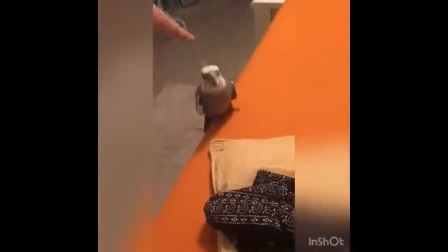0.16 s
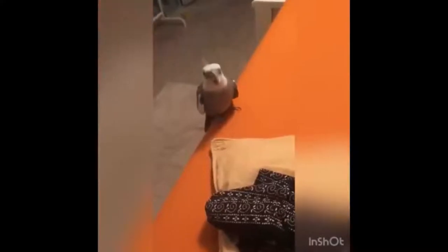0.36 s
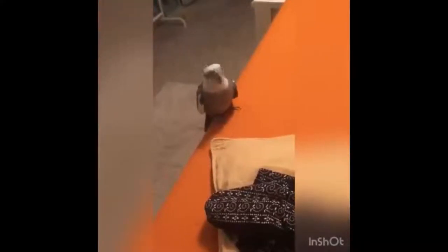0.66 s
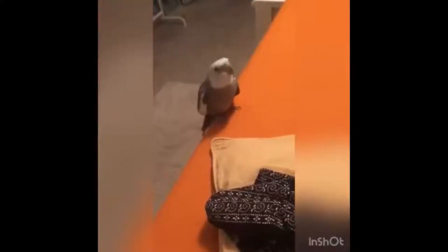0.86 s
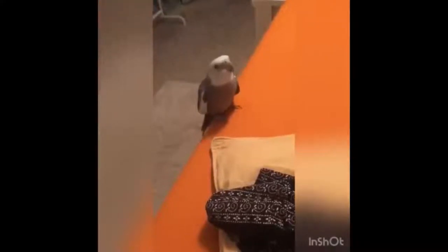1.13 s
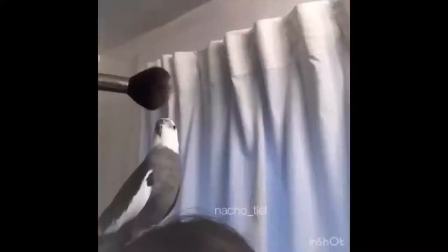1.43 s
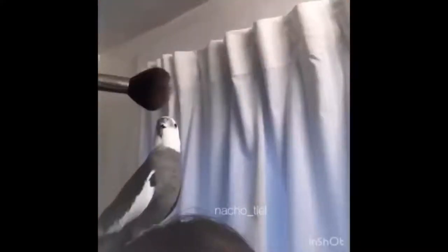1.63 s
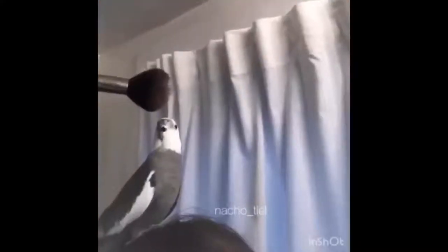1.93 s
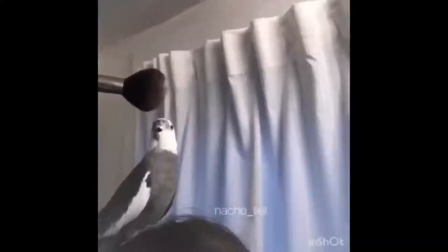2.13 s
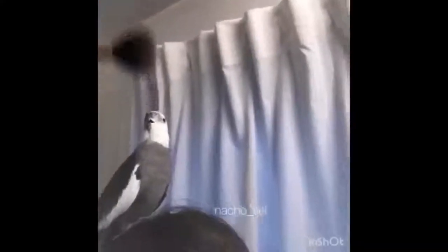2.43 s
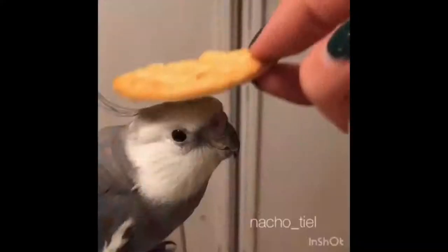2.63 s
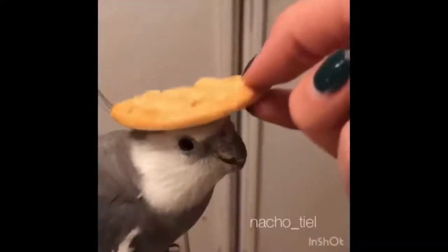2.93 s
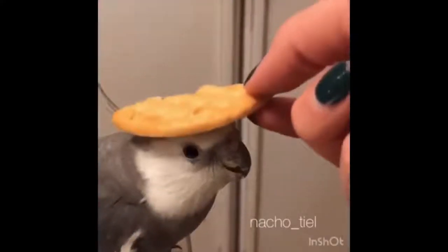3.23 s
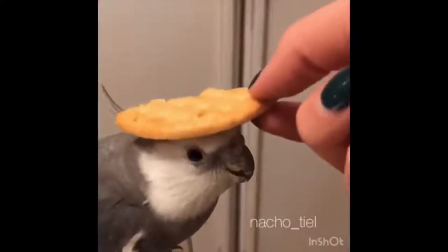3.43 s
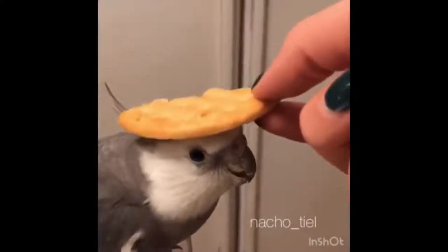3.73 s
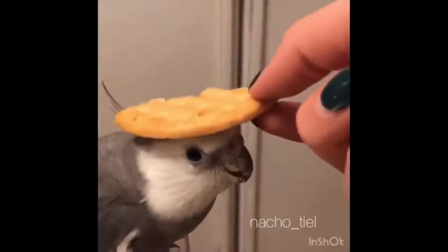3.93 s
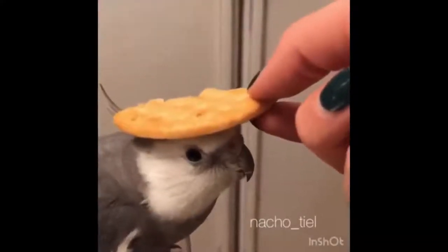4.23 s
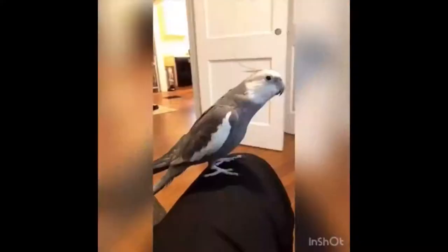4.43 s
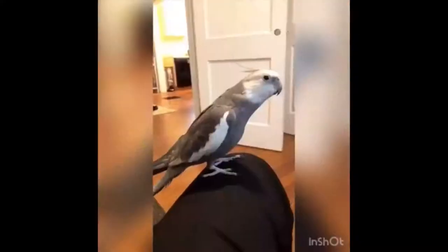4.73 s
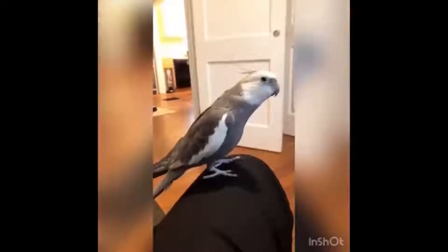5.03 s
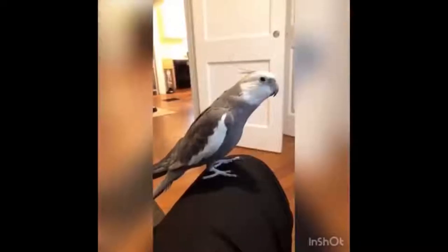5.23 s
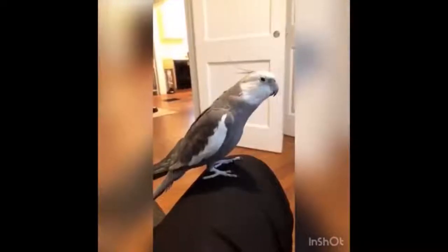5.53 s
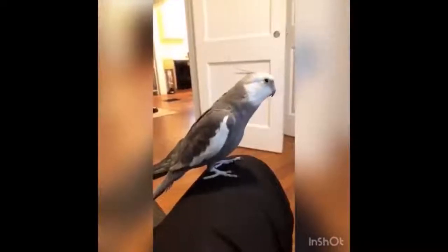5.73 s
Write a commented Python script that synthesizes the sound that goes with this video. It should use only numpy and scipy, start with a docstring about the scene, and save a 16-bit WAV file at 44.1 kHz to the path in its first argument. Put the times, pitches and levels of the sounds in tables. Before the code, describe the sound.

A cockatiel is already calling at the start, a little way from the microphone in a small, slightly echoing room. The call is loud, high and drawn out, with a rapid quaver, and it drops into a rasp at about 0.7 seconds. The faint room tone changes abruptly at 1.25 seconds. From 1.5 to 2.3 seconds a second call climbs out of a rasp, holds its shrill, trilling pitch and falls away. At about 2.6 seconds the low background noise jumps up, and from 2.9 to 4.1 seconds comes a third call of the same shape, very close, the longest and loudest. At 4.4 seconds the sound cuts to a much quieter room with a faint, low appliance hum. Four barely audible breathy puffs pass between 4.6 and 5.9 seconds, and the hum lasts to the end at about 6 seconds.

```python
"""A cockatiel in mid-call, long and quavering, across a table from the microphone. Two more calls follow,
each in its own room: one before a curtain, one very close. A fourth room holds a hum and breathy puffs.
Each call is a chain of throbs, about 27 a second: the membrane of the syrinx tightens and slackens, so
pitch and loudness arch in every throb. The voice climbs out of a rasp, holds near 2 kHz and sinks back
into one. Every room has its own steady room tone."""
import sys
import numpy as np
from scipy import signal
from scipy.fft import rfft, irfft, next_fast_len
from scipy.io import wavfile
from scipy.ndimage import uniform_filter1d, minimum_filter1d, map_coordinates

SR = 44100
rng = np.random.default_rng(int(sys.argv[2]) if len(sys.argv) > 2 else 0)


def unload_wav(signal):
    """Save mono or channel-first audio to the path in sys.argv[1] as 16-bit WAV at rate SR, clipped to [-1, 1]."""
    wavfile.write(
        sys.argv[1],
        SR,
        np.round(np.clip(np.atleast_2d(signal).T, -1, 1) * 32767).astype(np.int16),
    )


N = 258867
TIME = np.arange(N) / SR

# rhythm of each call: (first throb [s], end of the call [s], rate [throbs/s], slowing [throbs/s per s])
CALL_RHYTHMS = [(-.3002, .742, 26.73, 1.104), (1.501, 2.292, 28.16, .07), (2.873, 4.149, 29.035, 3.17)]
# resonances of each bird's throat and beak: (frequency [Hz], relative level [dB])
TABLE_THROAT = [(1000, -17), (1750, -8.5), (2050, 0), (3000, -10.5), (3600, -9.5), (4100, 1), (4900, -6),
                (5700, -1), (6150, -7), (7500, -13.5), (8150, -12.5), (10100, -27.5), (12000, -13),
                (14000, -26.5)]
CURTAIN_THROAT = [(1000, -2), (1700, 3.5), (2150, 0), (2900, 2.5), (3700, -1), (4300, 3.5), (4900, 2),
                  (5700, 9), (6450, -1.5), (7100, -8), (8600, -12.5), (10700, -23), (12900, -16),
                  (14000, -37.5)]
CLOSE_THROAT = [(1000, -23), (1700, -6.5), (2130, 0.5), (2800, -7.5), (3500, -12.5), (4280, -0.5),
                (4900, -3), (5700, 0.5), (6450, 3.5), (7400, -2), (8500, -4), (9600, -16.5), (11200, -15),
                (12700, -8)]
# opening of each beak, as the strength of its resonance: (time [s], level [dB])
TABLE_BEAK = [(.2, 0.5), (.42, 3.5), (.52, -1), (.68, 1.5), (.74, -5)]
CURTAIN_BEAK = [(1.54, -12), (1.72, -1.5), (2.2, 6), (2.294, -11)]
CLOSE_BEAK = [(2.9, -3), (3.1, 1.5), (4.05, 6), (4.14, 2)]
def birds():
    """Three cockatiels at the microphone: across a table, before a curtain, and very close."""
    table = call(
        CALL_RHYTHMS[0], TABLE_BEAK, TABLE_THROAT,
        tune=dict(held_hz=2123.5, sink_hz_per_s=130, climb_hz=730, drop_hz=256, drop_s=.028),
        effort=dict(held_db=-14, swell_db=16.5, attack_s=.095, tiring_db_per_s=5, drop_db=14),
        grain=dict(rasp_db=-26.5, break_db=4, tilt_db=0, dulling_per_s=-.4),
        sag=.145, dip_db=8, dull_db=3.5, fuzz_db=-30.5, slip_db=-34.5, fade_s=.014)
    curtain = call(
        CALL_RHYTHMS[1], CURTAIN_BEAK, CURTAIN_THROAT,
        tune=dict(held_hz=2131.3, sink_hz_per_s=-72, climb_hz=835, drop_hz=314, drop_s=.054),
        effort=dict(held_db=-13, swell_db=21.5, attack_s=.039, tiring_db_per_s=-.8, drop_db=6),
        grain=dict(rasp_db=-53.5, break_db=-1, tilt_db=2.5, dulling_per_s=.5),
        sag=.125, dip_db=11, dull_db=7.5, fuzz_db=-26, slip_db=-46.5, fade_s=.0063)
    close = call(
        CALL_RHYTHMS[2], CLOSE_BEAK, CLOSE_THROAT,
        tune=dict(held_hz=2170, sink_hz_per_s=42, climb_hz=673, drop_hz=513, drop_s=.047),
        effort=dict(held_db=-4, swell_db=13, attack_s=.07, tiring_db_per_s=3, drop_db=13),
        grain=dict(rasp_db=-48, break_db=4, tilt_db=.5, dulling_per_s=2),
        sag=.145, dip_db=9.5, dull_db=3.5, fuzz_db=-28.5, slip_db=-34, fade_s=.011)
    # this close, the microphone yields unevenly and the throbs leave a faint flutter
    close = close - .055 * close ** 2
    return [room(table, near_db=-12, near_t60=.09, far_db=-19, far_t60=.53),
            amp(-.45) * room(curtain, near_db=-6.5, near_t60=.098, far_db=-15.5, far_t60=.25),
            amp(1) * room(close, near_db=-20, near_t60=.04, far_db=-17.5, far_t60=.35)]


def call(rhythm, opening, throat, tune, effort, grain, sag, dip_db, dull_db, fuzz_db, slip_db, fade_s):
    """The syrinx sounds a throbbing harmonic tone, coloured by throat and beak, with fuzz and rasp."""
    taut_hz, beak_hz = 2100, 6000
    start, end = rhythm[:2]
    live = (TIME > start - .05) & (TIME < end + .05)
    t = TIME[live]
    age, left = np.maximum(t - start, 0), np.maximum(end - t, 0)
    turn = throbs(t, *rhythm)
    crest_hz = crest_pitch(age, left, **tune) + 12 * wobble(.98, turn)  # no two throbs are alike
    level_db = loudness(age, left, **effort) - .25 * wobble(1, turn)
    rasp_db, bright_db = texture(age, left, **grain)
    beak_db = np.interp(t, *np.transpose(opening))

    def colour(hz):
        beak = beak_db * np.exp(-((hz - beak_hz) / 1000) ** 2)
        return amp(along(throat, hz) + bright_db * np.log2(hz / crest_hz) + beak)

    # between throbs the membrane slackens: it sinks in pitch, goes dull and swings less evenly
    gap = np.sin(np.pi * turn) ** 2  # 0 on a crest, 1 between throbs
    slack = (.6 * gap + .4 * gap ** 3) * (taut_hz / crest_hz) ** 2.2  # low throbs let go further
    jitter = .004 * wobble(200, t) + .007 * gap * wobble(1000, t)
    throbbing = 1 - np.exp(-(left / .043) ** 2)  # the last throbs melt into one downward slide
    trill = sag * (1 - .2 * age) * (.5 + .5 * throbbing)  # the pitch swing eases with time
    trill *= 1 + .1 * wobble(1, turn + .5)
    pitch = crest_hz * np.exp(jitter - trill * slack)
    phase = 2 * np.pi * np.cumsum(pitch) / SR
    chirping = 1 + .55 * np.exp(-(age / .17) ** 2)  # the first throbs stand apart as chirps
    dip = throbbing * chirping * (.16 * slack + .84 * choke(turn))

    k = np.arange(1, 8)[:, None]  # harmonic numbers
    flutter_db = np.sqrt(k) * np.array([wobble(60, t) for _ in k])
    swing = amp(flutter_db - (dip_db + dull_db * (k - 2)) * dip)
    fuzz = turbulence(t, k, gap, fuzz_db, rasp_db)
    spread = np.pi * k * (k - 1) / 4  # overtone phases are spread to keep the tone's peaks low
    tone = -np.sum(colour(k * pitch) * (swing + fuzz) * np.exp(1j * (k * phase - spread)), axis=0).real
    tone += octave_slips(t, turn, gap, k, pitch, phase, colour, slip_db)
    tone /= np.sqrt(np.sum(colour(k * crest_hz) ** 2, axis=0) / 2)
    voice = (tone + rasp(t, rasp_db, dip)) / np.sqrt(1 + amp(rasp_db) ** 2)
    voice = spectral_notches(voice, rasp_db)

    outside_s = np.maximum(start - t, 0) + np.maximum(t - end, 0)
    out = np.zeros(N)
    out[live] = voice * amp(level_db) * np.exp(-(outside_s / fade_s) ** 1.2)
    return out


def throbs(t, start, end, rate, slowing):
    """Throbs counted so far: their rate sinks steadily and hurries at both ends of the call."""
    age = t - start
    gained_early = .4 * (1 - np.exp(-age / .15))
    gained_late = .33 * np.exp(np.minimum(t - end, 0) / .03)
    return rate * age - slowing * age ** 2 / 2 + gained_early + gained_late


def crest_pitch(age, left, held_hz, sink_hz_per_s, climb_hz, drop_hz, drop_s, climb_s=.06):
    """Pitch at the top of the throbs: a scoop up, a slowly drifting hold, a final drop."""
    scoop = climb_hz * np.exp(-age / climb_s)
    drop = drop_hz * np.exp(-(left / drop_s) ** 2)
    return held_hz - scoop - sink_hz_per_s * age - drop


def loudness(age, left, held_db, swell_db, attack_s, tiring_db_per_s, drop_db, release_s=.023):
    """Level in dB: a swell, a slowly drifting hold, a quick release."""
    swell = swell_db * np.exp(-age / attack_s)
    release = drop_db * np.exp(-(left / release_s) ** 2)
    return held_db - swell - tiring_db_per_s * age - release


def texture(age, left, rasp_db, break_db, tilt_db, dulling_per_s, settle_s=.14, break_s=.016):
    """Rasp (dB) and brightness (dB per octave): hoarse and dull at both ends, clear in between."""
    unsettled = np.exp(-(age / settle_s) ** 2)
    breaking = np.exp(-(left / break_s) ** 2)
    hoarseness = amp(rasp_db) + amp(-11.5) * unsettled + amp(break_db) * breaking
    bright_db = tilt_db - dulling_per_s * age - 13.5 * np.exp(-age / .04) - 1.5 * breaking
    return 20 * np.log10(hoarseness), bright_db


def choke(turn, lead=.025, softness=.14):
    """Near 0 while a throb sounds, near 1 between throbs; loudness leads pitch by a share of a throb."""
    gap = np.sin(np.pi * (turn + lead)) ** 2
    return .5 + .5 * np.tanh((gap - .62) / (2 * softness))


def turbulence(t, k, gap, fuzz_db, rasp_db):
    """Eddies wrap each overtone in a band of noise, wider for the high ones, that outlasts the throb."""
    eddies = np.array([wobble(280 * n, t) + 1j * wobble(280 * n, t) for n in k])
    fraying = amp(rasp_db - 17.5) * np.sqrt(k)  # a hoarse voice frays its overtones further
    return (amp(fuzz_db) * k ** .8 + fraying) * (.8 + .4 * gap) * eddies


# the clearest raspy spots, where the voice slips an octave down: (time [s], subharmonic level [dB])
OCTAVE_SLIPS = [(.67, -26), (1.902, -25.5), (2.07, -24.5), (2.145, -23.5), (2.988, -18.5), (3.34, -16),
                (3.485, -19), (3.61, -19)]
def octave_slips(t, turn, gap, k, pitch, phase, colour, slip_db, spread_db=6):
    """Alternate swings of the membrane differ, so tones appear halfway between the harmonics."""
    clear = sum(amp(db) * np.exp(-((t - at) / .0071) ** 2) for at, db in OCTAVE_SLIPS)
    by_chance = gap ** 2 * amp(slip_db + spread_db * wobble(1, turn + .5))
    half_phases = (k - .5) * (phase + .5 * wobble(700, t))
    return (clear + by_chance) * np.sum(colour((k - .5) * pitch) * np.cos(half_phases), axis=0)


# spectrum of the rasp: (frequency [Hz], relative density [dB])
RASP_SPECTRUM = [(300, -25.5), (900, -4.5), (1300, -9.5), (1750, -8), (2400, 2), (3700, -0.5), (4800, 9.5),
                 (5800, 7), (6800, -10.5), (8000, 2.5), (9800, -26), (12500, -9.5), (14000, -20)]
def rasp(t, rasp_db, dip, pulse_db=7):
    """Air torn at the syrinx: a broad, rough noise that pulses with the throbs."""
    return noise(RASP_SPECTRUM, len(t)) * amp(rasp_db + 4.3 * wobble(120, t) - pulse_db * dip)


# narrow dark bands in the call's sound: (frequency [Hz], gain [dB])
SPECTRAL_NOTCHES = [(2650, -3), (4950, -18), (9350, -9.5)]
def spectral_notches(voice, rasp_db, half_width_hz=350):
    """Narrow bands are dark while the tone is held and fill in as the call turns to rasp."""
    def response(hz):
        return amp(sum(db * np.exp(-((hz - mid) / half_width_hz) ** 2) for mid, db in SPECTRAL_NOTCHES))

    loose = np.clip((rasp_db + 20) / 20, 0, 1)
    return loose * voice + (1 - loose) * filtered(voice, response)


def room(x, near_db, near_t60, far_db, far_t60):
    """The microphone hears the direct sound, a flurry off near surfaces and a duller tail off the walls."""
    t = TIME[:SR // 2]
    near = rng.standard_normal(len(t)) * amp(-60 * t / near_t60) * (t > .002)
    hz, frame_s, spectra = signal.stft(rng.standard_normal(len(t)), SR, nperseg=256)
    decay = amp(-60 * frame_s / far_t60 * (1 + hz[:, None] / 16000) - hz[:, None] / 2600)
    far = signal.istft(spectra * decay, SR, nperseg=256)[1][:len(t)]
    echo = amp(near_db) * near / np.linalg.norm(near) + amp(far_db) * far / np.linalg.norm(far)
    return x + signal.fftconvolve(x, echo)[:N]


# faint, breathy puffs in the last room: (time [s], length [s], level [dB])
PUFFS = [(4.574, 0.161, -65), (4.788, .28, -65.5), (5.35, 0.24, -72), (5.658, 0.19, -62.5)]
# their narrow resonances: (frequency [Hz], width [Hz], relative level [dB])
PUFF_RESONANCES = [(1258, 27, 2), (2250, 27, -6), (4590, 45, -11), (6200, 57, -15), (7150, 78, -19)]
# their broad hiss: (frequency [Hz], relative density [dB])
PUFF_HISS = [(300, -20), (800, 1), (2200, -3), (7000, -12.5), (10000, -20)]
def breathy_puffs(attack_s=.014, fade_db=7):
    """Faint, breathy puffs of noise with a narrow ring near 1.25 kHz, like soft nasal breathing."""
    def response(hz):
        return sum(amp(db) * 1j * hz * width / (centre ** 2 - hz ** 2 + 1j * hz * width)
                   for centre, width, db in PUFF_RESONANCES)

    ring = unit(filtered(rng.standard_normal(N), response))
    breath = unit(ring + amp(-3) * noise(PUFF_HISS, N))
    envelope = np.zeros(N)
    for start, length, db in PUFFS:
        progress = np.clip((TIME - start) / length, 0, 1)
        envelope += amp(db - fade_db * progress) * gate(start, start + length, attack_s)
    return breath * envelope * amp(2 * wobble(35, TIME))


# motor tones of an appliance in the last room: (frequency [Hz], rms level [dB])
MOTOR_TONES = [(118.4, -61.5), (220.7, -59.5), (242.2, -71), (258.4, -59), (479.1, -70)]
def appliance_hum():
    """A motor hums in low tones, each slightly unsteady in level and phase."""
    out = np.zeros(N)
    for hz, db in MOTOR_TONES:
        peak = np.sqrt(2) * amp(db + .96 * wobble(3.9, TIME))
        out += peak * np.sin(2 * np.pi * hz * TIME + .5 * wobble(1.7, TIME))
    return out


# room tone at each microphone position: (frequency [Hz], relative density [dB])
TABLE_AIR = [(15, -36.5), (25, -13), (164, -1.5), (286, -8.5), (318, -9), (584, -12.5), (1260, -27.5),
             (1400, -23.5), (14000, -55.5)]
CURTAIN_AIR = [(15, -64), (25, -35), (91, -1.5), (192, -15), (271, -6), (344, -18), (868, -27), (1230, -27),
               (1870, -38.5), (14000, -50.5)]
CLOSE_AIR = [(25, -33), (55, 0.5), (85, -7.5), (185, -5), (228, 3), (270, -2), (480, -10.5), (700, -10.5),
             (920, -2), (1080, -9.5), (1280, -6), (1800, -15.5), (4500, -31), (14000, -50)]
LAST_ROOM_AIR = [(15, -73.5), (25, -23), (91, -12.5), (107, -10), (187, -11), (244, -3.5), (372, -17.5),
                 (485, -20.5), (539, -28.5), (584, -25.5), (1050, -35.5), (1260, -35), (1730, -40.5),
                 (2500, -42.5), (14000, -53)]
def room_tones():
    """The steady, bass-heavy background of each of the four rooms, at rms 1."""
    return [noise(air, N) for air in (TABLE_AIR, CURTAIN_AIR, CLOSE_AIR, LAST_ROOM_AIR)]


def amp(db):
    """Decibels to gain."""
    return 10 ** (np.asarray(db) / 20)


def unit(x):
    """x at rms 1."""
    return x / np.sqrt(np.mean(x ** 2) + 1e-20)


def along(points, hz):
    """(Hz, value) points read on a log axis."""
    knots_hz, values = np.transpose(points)
    return np.interp(np.log(hz + 1), np.log(knots_hz + 1), values)


def wobble(rate, t):
    """A smooth random curve with rate knots per unit of t."""
    return map_coordinates(rng.standard_normal(2 ** 14), [t * rate], mode="wrap")


def gate(start, end, ramp_s):
    """1 from start to end and 0 outside, with straight ramps."""
    return np.clip(np.minimum(TIME - start, end - TIME) / ramp_s + .5, 0, 1)


def filtered(x, response):
    """x through a frequency response."""
    size = next_fast_len(len(x) + 2 ** 13)
    return irfft(rfft(x, size) * response(np.fft.rfftfreq(size, 1 / SR)), size)[:len(x)]


def noise(spectrum, size):
    """Coloured noise of rms 1."""
    return unit(filtered(rng.standard_normal(size), lambda hz: amp(along(spectrum, hz))))


def limiter(x, ceiling=.96):
    """Fast gain control flattens the loudest throbs just under full scale."""
    needed = np.minimum(1, ceiling / (abs(x) + 1e-9))
    return x * uniform_filter1d(minimum_filter1d(needed, size=133), size=111)


# the microphone's stay in each room: (start [s], end [s], room tone level [dB])
ROOM_STAYS = [(-.1, 1.254, -48.5), (1.248, 2.557, -53.5), (2.56, 4.412, -35), (4.41, 5.991, -52)]
def scene():
    """Four rooms follow each other abruptly, each with its source and its room tone."""
    sources = birds() + [appliance_hum() + breathy_puffs()]
    out = np.zeros(N)
    for (start, end, db), source, air in zip(ROOM_STAYS, sources, room_tones()):
        out += gate(start, end, ramp_s=.0016) * (source + amp(db) * air)
    return out[None]


def record(dry):
    """One microphone channel through a limiter and a steep treble cut."""
    top_hz = 13850
    return filtered(limiter(dry[0]), lambda hz: 1 / np.sqrt(1 + (hz / top_hz) ** 240))[None]


dry = scene()
out = record(dry)
unload_wav(out)
```